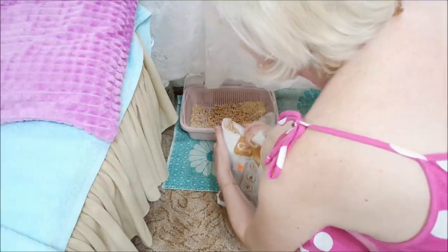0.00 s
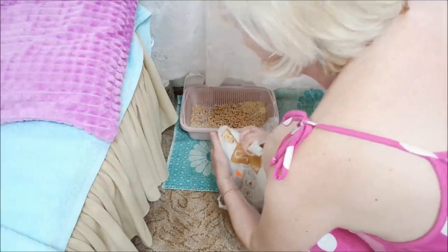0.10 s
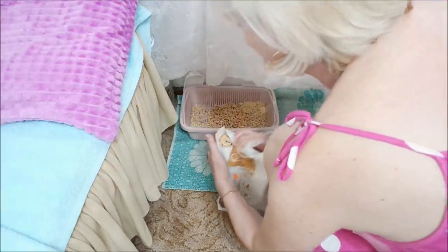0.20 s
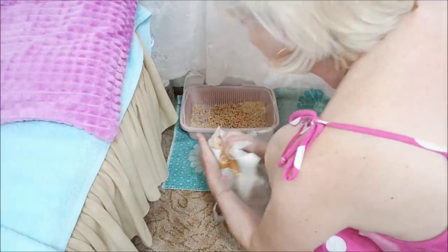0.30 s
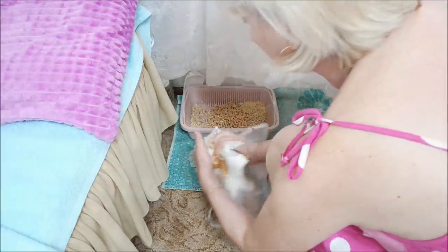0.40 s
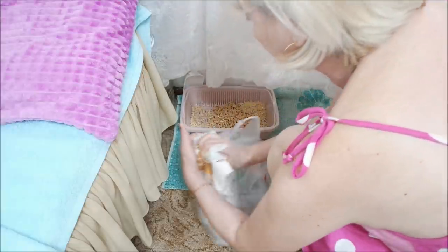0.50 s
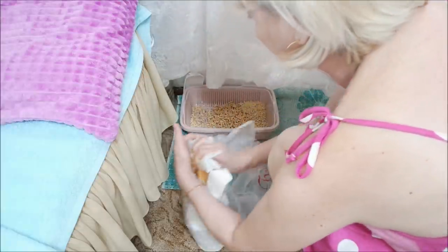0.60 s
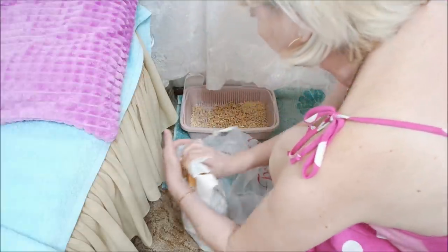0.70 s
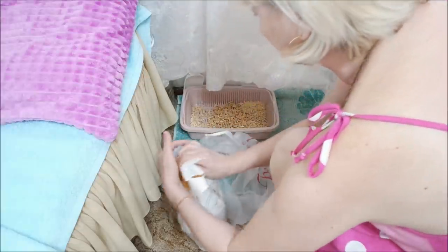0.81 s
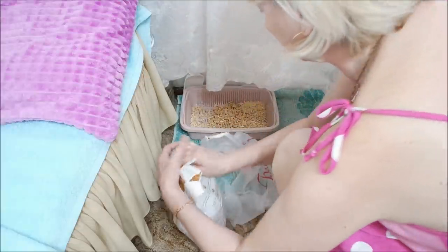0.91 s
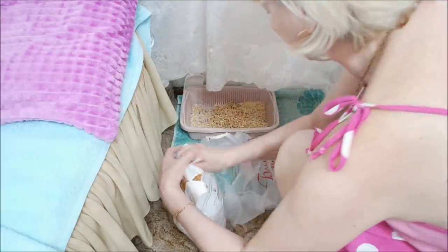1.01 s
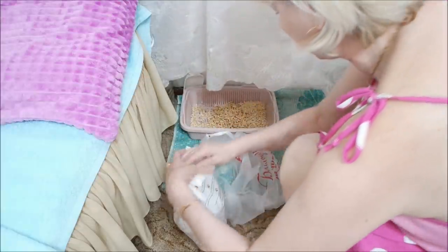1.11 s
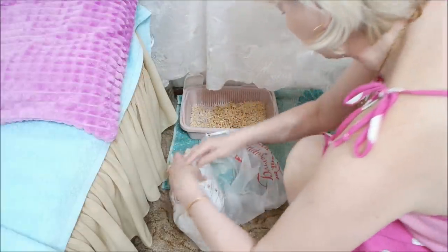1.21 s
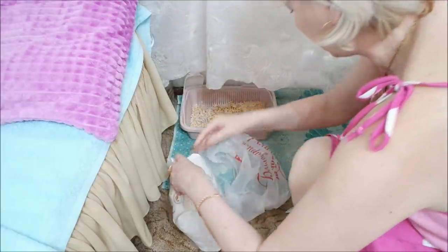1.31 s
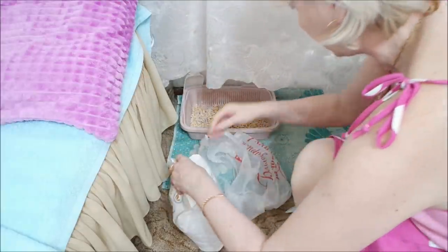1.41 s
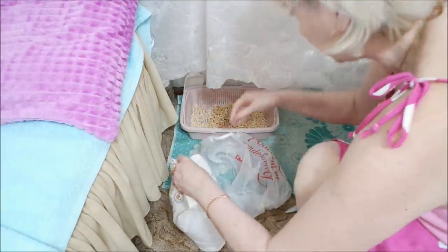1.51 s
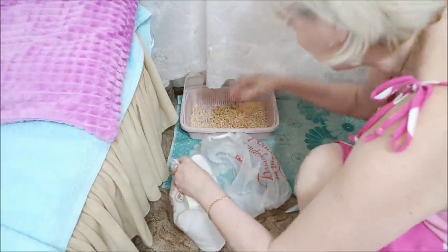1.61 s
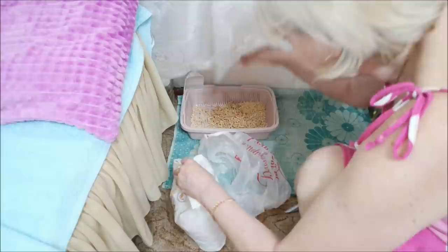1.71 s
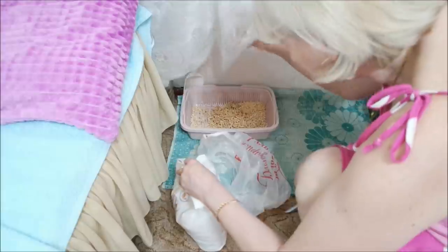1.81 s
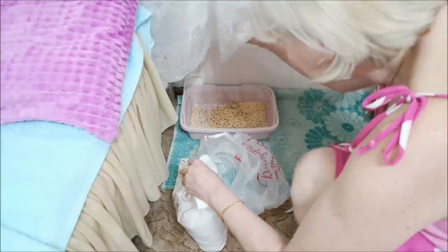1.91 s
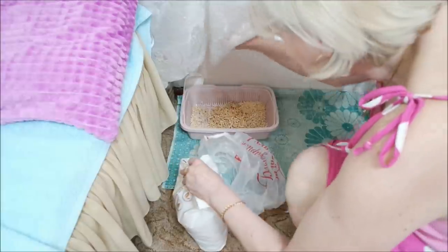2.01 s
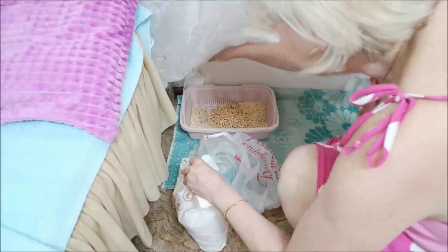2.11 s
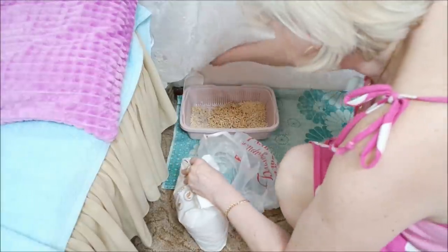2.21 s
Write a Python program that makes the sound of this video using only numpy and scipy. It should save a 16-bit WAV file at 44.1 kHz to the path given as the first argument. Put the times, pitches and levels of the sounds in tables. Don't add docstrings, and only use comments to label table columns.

```python
import sys
import numpy as np
from scipy import signal
from scipy.fft import rfft, irfft
from scipy.io import wavfile
from scipy.ndimage import uniform_filter1d

SR = 44100
rng = np.random.default_rng(int(sys.argv[2]) if len(sys.argv) > 2 else 0)


def boost_factor(decibels):
    exponent = np.asarray(decibels, float) / 20
    return 10 ** exponent


def master_out(mix):
    frames = np.transpose(np.atleast_2d(mix))
    ceiling = np.clip(frames, -1, 1)
    pcm = np.round(ceiling * 32767).astype(np.int16)
    wavfile.write(sys.argv[1], SR, pcm)


N = 101430

# start in seconds, peak level in dB, pitch of the patch in Hz, crisp top in dB, air in the bag
# in dB.
CREASES = [(0.088, -28.5, 1060, -12, -18), (0.168, -33, 1660, -12, -18),
           (0.21, -47, 1230, -13, -37), (0.233, -21, 2770, -12, -9.5),
           (0.237, -15.5, 1370, -19, -28), (0.251, -16, 1160, -21, -51),
           (0.2657, -13.5, 3720, -5, -17), (0.274, -21, 1420, -13, -4.5),
           (0.341, -16, 704, -8, -49), (0.355, -15.5, 1470, -15, -51), (0.385, -16, 714, -28, -40),
           (0.404, -22, 4670, -5, -47), (0.437, -43.5, 3070, 14, -19),
           (0.479, -16.5, 3000, -4.5, -17), (0.483, -14.5, 4620, -7, -45),
           (0.495, -44, 950, -18, -2), (0.519, -36, 2750, -17, -35),
           (0.535, -12.5, 4800, -25, -19.5), (0.546, -17.5, 1770, 4, -39),
           (0.555, -10.5, 830, -28, -16), (0.568, -16, 1220, -6, -30), (0.583, -10, 3350, 0, -17.5),
           (0.603, -28, 2800, -9, -16),
           (0.643, -23, 920, -19, -8), (0.678, -11.5, 1380, -13, -33), (0.728, -26.5, 1460, -28, -9.5),
                (0.777, -14.5, 2720, -50, -14), (0.812, -19, 820, -16, -15),
                (0.867, -23.5, 2650, -5.5, -16.5), (1.002, -19, 3000, -46, -17.5),
                (1.032, -22.5, 900, -26, -29), (1.05, -17, 2650, -9.5, -16.5), (1.093, -21, 2450, -36, -18),
                (1.123, -27, 2130, 1.5, -45), (1.138, -19, 2370, -24, -31), (1.195, -21, 2700, -14, -46),
                (1.212, -19, 2040, -13, -17), (1.239, -17, 1050, -9, -15.5), (1.255, -22, 2330, -5, -11),
                (1.262, -11.5, 1950, -16, -41), (1.289, -20, 2950, -9.5, -45),
                (1.326, -18, 2380, -9.5, -20), (1.346, -15, 2250, -13.5, -22), (1.396, -27, 1200, -22, -33),
                (1.409, -18.5, 2650, -11, -18), (1.438, -18, 2570, -45, -10),
           (1.445, -11, 2760, -4, -28), (1.4784, -13, 2200, -5, -41), (1.486, -15, 2060, -47, -40),
                  (1.521, -23, 1710, -34, -21), (1.565, -23, 1680, -30, -20),
                  (1.574, -28.5, 2250, -31, -32), (1.593, -16.5, 2680, -2.5, -18),
                  (1.61, -20.5, 1640, -35, -31), (1.651, -24.5, 2400, -28, -26),
                  (1.671, -21.5, 950, -39, -49), (1.679, -26.5, 5000, -16, -42),
                  (1.692, -15, 1920, -8, -30), (1.742, -27, 1220, -20, -37), (1.851, -21.5, 1560, -15, -55),
                  (1.878, -31, 2200, -18, -12.5), (1.901, -23.5, 1320, -23, -20),
                  (1.941, -26.5, 2580, -3, -25), (1.953, -30, 2680, -29, -17),
                  (1.997, -11, 1233, -8.5, -26), (2.085, -29.5, 4540, -46, -19.5),
                  (2.159, -26, 2650, -6, -14.5), (2.209, -40, 900, -21, -2.5),
                  (2.252, -25.5, 970, -13, -20.5),
           (.242, -25, 2490, -16, -36), (.3221, -32, 1000, -11, -30), (0.501, -23, 3000, -12, -18),
               (0.506, -18, 2000, -17, -17), (0.515, -16, 1530, -30, -21), (0.522, -25, 1700, -2, -32),
               (.541, -16, 2200, -20, -24), (0.548, -16, 2980, 3.5, -29), (0.576, -30, 1490, -11, -32),
               (0.632, -22.5, 1500, -15, -12), (0.672, -21, 1100, -35, -34), (.682, -12.5, 1890, -9.5, -23),
               (0.699, -18.5, 980, -17, -11), (.706, -29, 1410, -25, -31), (0.786, -45, 3000, -9, -30),
               (.834, -26, 3000, -10, -28), (1.4483, -14, 4500, -4.5, -21), (1.46, -23, 2200, -17, -37),
               (1.66, -48, 3500, -13, -30), (1.694, -17, 4100, -8, -21), (1.699, -28.5, 3170, -3, -30),
               (1.715, -31, 2770, -12, -35), (2.1625, -24.5, 4500, -13, -13), (1.013, -32, 2950, -8, -36),
               (1.115, -30, 4000, -3, -30), (1.167, -29, 5000, -8, -35), (1.5951, -19, 4140, -4, -29),
               (0.943, -33, 4000, -11, -32), (1.91, -31.5, 2500, -21, -32), (0.559, -21, 3000, -12, -27)]
# time in seconds, pressure in dB, shifting weight in dB.
HAND = [(0, -40.5, -45), (.06, -48.5, -56), (.15, -52, -64), (.225, -40.5, -45), (0.249, -46, -34),
        (.32, -37.5, -46), (.4, -40, -44.5), (0.457, -38, -46.5), (0.499, -30.5, -34.5),
        (.62, -31.5, -39.5), (.75, -41, -46), (.85, -42, -44.5), (0.978, -44, -46.5), (1.1, -44, -44.5),
        (1.3, -39.5, -42), (1.5, -40, -43.5), (1.55, -47.5, -68), (1.75, -46, -52), (1.829, -60, -63),
        (2.3, -65.5, -65)]
# frequency in Hz, level in dB per Hz.
FILM_TONE = [(180, -14), (300, 1), (600, 0), (1100, 2), (2800, -2.5), (6000, -8), (9000, -11), (12000, -6),
             (16000, -9)]
# frequency in Hz, level in dB per Hz.
BULK_TONE = [(20, -5), (60, -2), (110, 2.5), (260, 7), (600, 2.5), (1200, 1), (2000, -60)]
CRACKLE_PATCHES = [1200, 3000, 6500, 12000]
# start in seconds, level in dB, pitch in Hz.
BUMPS = [
    (0.271, -44.5, 130),
    (0.481, -41, 132),
    (0.585, -36.5, 108),
    (0.688, -35, 107),
    (1.261, -46, 116),
    (1.451, -54, 130),
    (1.598, -51.5, 120),
    (1.903, -50, 130),
    (2.168, -45.5, 118),
]
# start in seconds, level in dB, pitch in Hz, time to fall 60 dB in seconds.
POCKETS = [
    (.002, -39, 893, 0.13),
    (.275, -28, 334, 0.081),
    (1.597, -37, 426, .1),
    (1.694, -31, 1170, .035),
    (1.998, -25, 1190, .035),
    (2.161, -28, 678, 0.061),
    (2.168, -40, 601, 0.19),
    (2.209, -37, 900, .025),
]
# frequency in Hz, time to fall 60 dB in seconds.
ROOM_DECAY = [(200, 0.32), (600, 0.16), (1500, 0.14), (4000, 0.1), (10000, 0.085), (15000, 0.076)]
# frequency in Hz, level in dB per Hz.
HOUSE_TONE = [(20, 8), (60, 5), (110, 6.5), (200, 6), (500, -15), (1500, -28), (4000, -11), (15000, -15)]

RISE_S, VOLLEY_S, FADE_S = 0.0003, 0.002, 0.0022
TICK_SPREAD_DB, BREAK_DB = 3, 4.5
PATCH_Q, PATCH_DB, PATCH_REF_HZ = 1.6, -15, 2500
SHEET_DB, SHEET_HZ, SHEET_WIDTH_HZ, SHEET_CUT_HZ = -10, 2204, 5410, 790
CRISP_HZ, CRISP_TOP_HZ, CRISP_S, CRISP_DB = 4500, 15160, 0.0018, -3.5
BELLY_HZ, BELLY_WIDTH_HZ, BELLY_DB, BELLY_CUT_HZ = 407, 1045, 2.5, 220
CRACKLE_PER_S, CRACKLE_SPREAD_DB, CRACKLE_DB, CRACKLE_S = 200, 3.3, -1, 0.0018
RUSTLE_DB = -8.5
BUMP_RISE_S = 0.0089
ROOM_DB, ROOM_GAP_S, ROOM_CUT_HZ = -2.5, 0.00053, 149
HOUSE_DB = -58
RUMBLE_HZ, RUMBLE_WIDTH_HZ, RUMBLE_DB, RUMBLE_SHARE = 48, 8.5, -39, 0.44
EDGE_HZ, EDGE_DB, CUT_HZ = 14950, -50, 16500


def evened(x):
    return x / np.sqrt(np.mean(x ** 2) + 1e-20)


def read(points, hz):
    f, value = np.transpose(points)
    return np.interp(np.log(hz + 1), np.log(f + 1), value)


def coloured(x, points):
    hz = np.fft.rfftfreq(len(x), 1 / SR)
    inside = (hz >= points[0][0]) & (hz <= points[-1][0])
    return evened(irfft(rfft(x) * boost_factor(read(points, hz)) * inside, len(x)))


def ring(x, hz, width_hz):
    return signal.lfilter(*signal.iirpeak(hz, hz / width_hz, SR), x)


def above(x, hz):
    return signal.sosfilt(signal.butter(3, hz, "high", fs=SR, output="sos"), x)


def crease(ticks, peak_db, patch_hz, crisp_db, belly_db):
    t = np.arange(len(ticks)) / SR
    drive = ticks * np.clip(t / RISE_S, 0, 1) * np.exp(-np.maximum(t - VOLLEY_S, 0) / FADE_S)
    drive = drive * boost_factor(BREAK_DB * np.exp(-t / (3 * RISE_S)))

    patch = ring(ring(drive, patch_hz, patch_hz), patch_hz, patch_hz / PATCH_Q)
    sheet = ring(ring(drive, SHEET_HZ, SHEET_WIDTH_HZ), SHEET_HZ, SHEET_WIDTH_HZ)
    sheet = above(sheet, SHEET_CUT_HZ)
    crisp_band = signal.butter(2, [CRISP_HZ, CRISP_TOP_HZ], "band", fs=SR, output="sos")
    crisp = signal.sosfilt(crisp_band, drive * np.exp(-t / CRISP_S))
    belly = ring(ring(drive, BELLY_HZ, 3 * BELLY_WIDTH_HZ), BELLY_HZ, BELLY_WIDTH_HZ)

    patch_level_db = PATCH_DB + 10 * np.log10(patch_hz / PATCH_REF_HZ)
    parts = [patch, sheet, crisp, belly]
    levels_db = [patch_level_db, SHEET_DB, CRISP_DB + crisp_db, BELLY_DB + belly_db]
    return sum(boost_factor(peak_db + db) * 12 * p / np.linalg.norm(p) for p, db in zip(parts, levels_db))


def creases():
    rows = CREASES
    out = np.zeros(N + 2048)
    draws = rng.standard_normal((len(rows), 2, 2048))
    for (start_s, *row), (grain, spread) in zip(rows, draws):
        ticks = grain * boost_factor(TICK_SPREAD_DB * spread)
        out[round(start_s * SR):][:2048] += crease(ticks, *row)
    return above(out[:N], BELLY_CUT_HZ)


def crackle():
    fall = np.exp(-2 / (CRACKLE_S * SR))
    out = np.zeros(N)
    for hz in CRACKLE_PATCHES:
        hit, size, grain = rng.random(N), rng.exponential(1, N), rng.standard_normal(N)
        force = boost_factor(2 * CRACKLE_SPREAD_DB * np.minimum(size, 3.5))
        starts = (hit < CRACKLE_PER_S / SR) * force
        power = signal.lfilter([1], [1, -fall], starts)
        out += ring(grain * np.sqrt(power), hz, hz)
    return out


def film():
    time_s, press_db, _ = np.transpose(HAND)
    sheet = boost_factor(CRACKLE_DB) * coloured(crackle(), FILM_TONE)
    sheet = sheet + boost_factor(RUSTLE_DB) * coloured(rng.standard_normal(N), FILM_TONE)
    return boost_factor(np.interp(np.arange(N) / SR, time_s, press_db)) * sheet


def bulk():
    time_s, _, weight_db = np.transpose(HAND)
    low, wobble = rng.standard_normal((2, N))
    slow = uniform_filter1d(uniform_filter1d(wobble, 600), 600)
    lumps = boost_factor(1.8 * evened(slow))
    return boost_factor(np.interp(np.arange(N) / SR, time_s, weight_db)) * lumps * coloured(low, BULK_TONE)


def bumps():
    out, t = np.zeros(N + 8192), np.arange(8192) / SR
    swell = np.e * t / BUMP_RISE_S * np.exp(-t / BUMP_RISE_S)
    for start_s, db, hz in BUMPS:
        out[round(start_s * SR):][:8192] += boost_factor(db) * swell * np.sin(2 * np.pi * hz * t)
    return out[:N]


def pockets():
    out, t = np.zeros(N + 8192), np.arange(8192) / SR
    draws = rng.standard_normal((len(POCKETS), 8192))
    for (start_s, db, hz, t60), fuzz in zip(POCKETS, draws):
        note = np.sin(2 * np.pi * hz * t) + 0.43 * evened(ring(fuzz, hz, hz / 4))
        attack = np.clip(t / 0.0017, 0, 1)
        out[round(start_s * SR):][:8192] += boost_factor(db - 60 * t / t60) * attack * note
    return out[:N]


def room(x):
    at, out = np.arange(0, SR // 2 - 20, 8), np.zeros(N)
    for k in range(4):
        taps = np.zeros(SR // 2)
        taps[at + rng.integers(0, 8, len(at))] = rng.choice([-1., 1.], len(at))
        hz, t, z = signal.stft(taps, SR, nperseg=128)
        decay = boost_factor(-60 * t / read(ROOM_DECAY, hz)[:, None])
        tail = signal.istft(z * decay, SR, nperseg=128)[1]
        tail *= np.clip(np.arange(len(tail)) / SR / ROOM_GAP_S, 0, 1)
        turn = np.maximum(np.cos(2 * np.pi * (np.arange(N) / SR * 310 + k / 4)), 0)
        out += signal.fftconvolve(x * turn, tail / np.linalg.norm(tail))[:N]
    return above(out, ROOM_CUT_HZ)


def rumble():
    time_s, _, weight_db = np.transpose(HAND)
    t = np.arange(N) / SR
    load_db = uniform_filter1d(np.interp(t, time_s, weight_db), SR // 6)
    fuzz = evened(ring(rng.standard_normal(N), RUMBLE_HZ, RUMBLE_WIDTH_HZ))
    note = np.sin(2 * np.pi * RUMBLE_HZ * t) + 0.42 * fuzz
    return boost_factor(RUMBLE_DB + RUMBLE_SHARE * load_db) * note


def house():
    return boost_factor(HOUSE_DB) * coloured(rng.standard_normal(N), HOUSE_TONE)


def scene():
    bag = creases() + film()
    tail = boost_factor(ROOM_DB) * room(bag)
    return (bag + tail + bulk() + bumps() + pockets() + rumble() + house())[None]


def roll_off(x):
    return signal.sosfilt(signal.butter(12, 16340, fs=SR, output="sos"), x)


def record(dry):
    corners_hz = [0, EDGE_HZ, EDGE_HZ + 130, CUT_HZ, CUT_HZ + 150, SR / 2]
    gains = [1, 1, boost_factor(EDGE_DB * 0.75), boost_factor(EDGE_DB), 0, 0]
    edge = signal.firwin2(1501, corners_hz, gains, fs=SR)
    return roll_off(signal.oaconvolve(dry, edge[None], "same"))


dry = scene()
out = record(dry)
master_out(out)
```